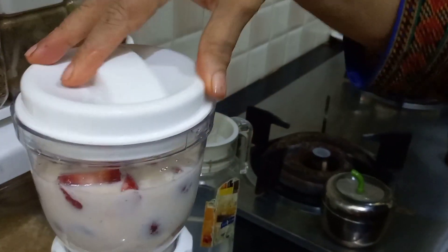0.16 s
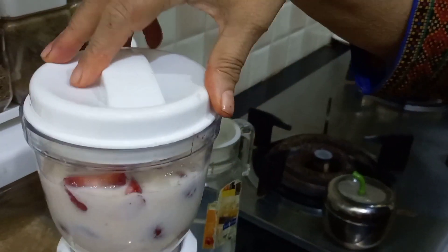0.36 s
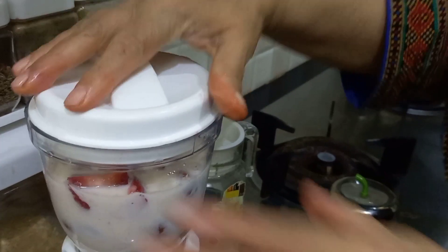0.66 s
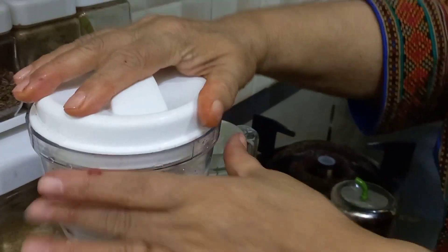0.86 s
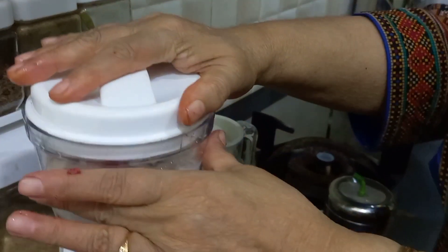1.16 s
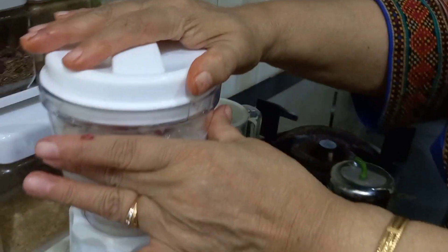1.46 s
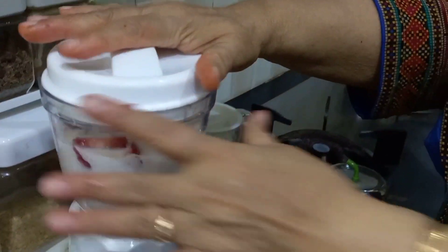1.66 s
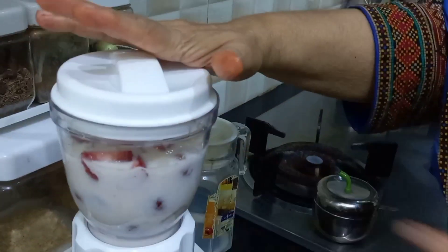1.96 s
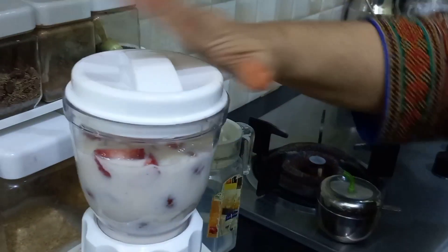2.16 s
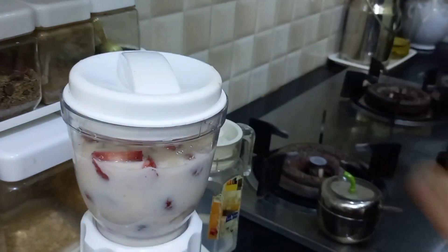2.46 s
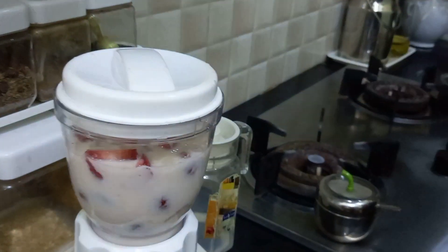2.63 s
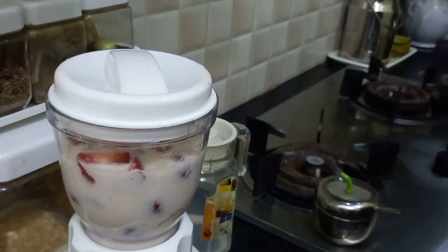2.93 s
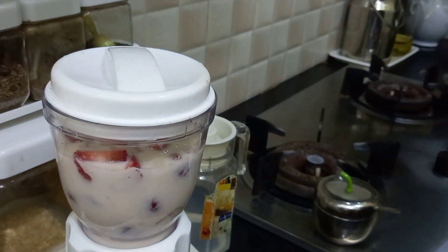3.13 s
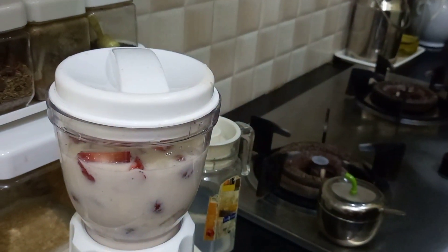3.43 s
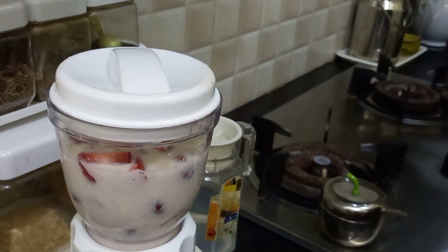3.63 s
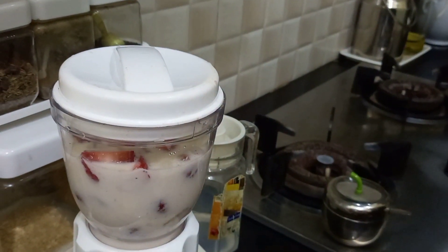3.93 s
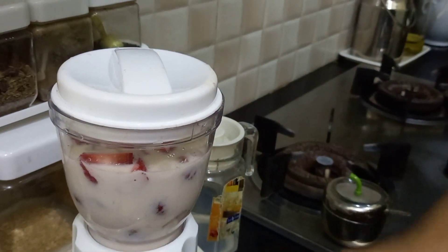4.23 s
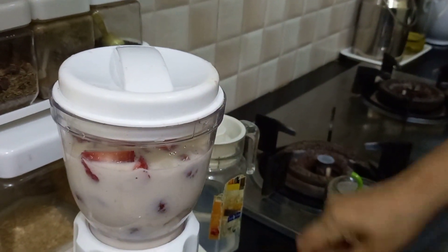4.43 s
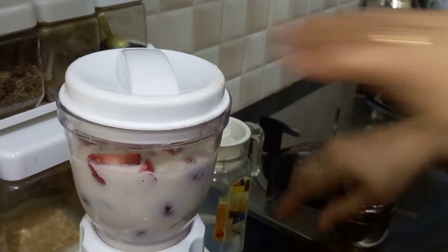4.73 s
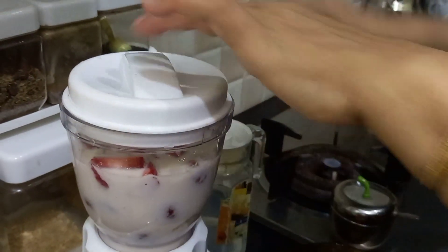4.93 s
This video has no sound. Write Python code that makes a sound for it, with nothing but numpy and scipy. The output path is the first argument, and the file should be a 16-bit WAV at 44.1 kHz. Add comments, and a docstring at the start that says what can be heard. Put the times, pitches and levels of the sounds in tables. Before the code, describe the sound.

A close stereo pickup in a small, reflective tiled kitchen, with low steady hiss and a faint wavering mains hum throughout. In the first quarter second a plastic lid is pressed onto a jar: a tight flurry of hollow finger thuds and bright rim clicks. Another click and a faint thud come at about 0.5 s, a dull double thud at 0.65, and light clicks at 0.9, 1.4 and 1.8. Skin and sleeve brush softly, most clearly around 1.1 s. Two quick palm taps and a click fall near 2.2 s, with tiny touches at 2.8. Then mostly faint rubbing between 3.1 and 3.75. At 4.04 s a catch snaps loudly, a hard object grinds and rings along the counter, swelling until about 4.5, and a cluster of very loud, hard knocks at 4.55 ends it. The short room tail fades into soft rubbing near 4.7 and a faint tap at 5.0.

```python
"""Lid pressed onto a jar, then a catch released

A plastic lid is pressed onto a blender jar in a small tiled kitchen: rim clicks, finger thuds, skin rubbing.
Later something hard comes off its catch, is dragged over the counter and banged home.
Each blow is a pulse plus decaying noise reflections, filtered by the resonances of the struck body.
Rubbing and dragging are shaped noise; wavering sines make a faint mains hum under steady room hiss.
"""
import sys
import numpy as np
from scipy import signal
from scipy.fft import rfft, irfft
from scipy.io import wavfile
from scipy.ndimage import uniform_filter1d

SR = 44100
rng = np.random.default_rng(int(sys.argv[2]) if len(sys.argv) > 2 else 0)


def dump(signal):
    """Clip the signal to [-1, 1] and save it as 16-bit WAV at the path in sys.argv[1]."""
    limited = np.clip(np.atleast_2d(signal).T, -1, 1)
    pcm = np.round(limited * 32767).astype(np.int16)
    wavfile.write(sys.argv[1], SR, pcm)


N = 224198


def amp(db):
    """Decibels to gain."""
    return 10 ** (np.asarray(db) / 20)


def evened(x):
    """Scales to rms 1."""
    return x / np.sqrt(np.mean(x ** 2) + 1e-20)


def read(points, hz):
    """Interpolates a spectrum table on a log-frequency axis."""
    point_hz, value = np.transpose(points)
    return np.interp(np.log(hz + 1), np.log(point_hz + 1), value)


def add(mix, start_s, sound):
    """Mixes a two-channel sound in at start_s, cut at the end of the mix."""
    part = mix[:, round(start_s * SR):][:, :sound.shape[1]]
    part += sound[:, :part.shape[1]]


def follow(time_s, level_db):
    """Gain along a level curve, -200 dB outside it."""
    return amp(np.interp(np.arange(N) / SR, time_s, level_db, left=-200, right=-200))


def colour_db(hz, broad, modes):
    """Broad spectrum plus bell-shaped resonances, each width_hz wide at half its dB height."""
    total_db = read(broad, hz)
    for mode_hz, width_hz, height_db in modes:
        total_db = total_db + height_db / (1 + (2 * (hz - mode_hz) / width_hz) ** 2)
    return total_db


def causal(gain_db):
    """Minimum-phase impulse response with the given gain curve, energy 1."""
    log_gain = np.log(amp(np.maximum(gain_db, -100)))
    circle = np.r_[log_gain, log_gain[-2:0:-1]]
    phase = -signal.hilbert(circle).imag
    taps = np.fft.ifft(np.exp(circle + 1j * phase)).real
    return taps / np.linalg.norm(taps)


def pair(frames, size, same, lag_ms):
    """Random short-time spectra for left and right, partly alike, the shared part late on the left."""
    hz = np.fft.rfftfreq(size, 1 / SR)
    a, b, c, d = rng.standard_normal((frames, len(hz), 4)).T
    alike = np.clip(read(same, hz), 0, 1)[:, None]
    right, own = a + 1j * b, c + 1j * d
    late = np.exp(-2j * np.pi * hz * lag_ms / 1000)[:, None]
    left = alike * right * late + np.sqrt(1 - alike ** 2) * own
    return hz, np.array([left, right])


def hiss(broad, modes, same, lag_ms, patchy_db, size=1024):
    """Steady coloured noise with drifting spectral patches, rms 1."""
    hop = size // 4
    frames = N // hop + 10
    hz, spectra = pair(frames, size, same, lag_ms)
    patches = rng.standard_normal((frames, len(hz))).T
    patches = uniform_filter1d(uniform_filter1d(patches, size=16, axis=0), size=16, axis=1)
    spectra *= amp(colour_db(hz, broad, modes)[:, None] + patchy_db * evened(patches))
    return evened(signal.istft(spectra, nperseg=size, noverlap=size - hop)[1][:, :N])


# left-right likeness of struck and dragged sounds: freq_hz, likeness_0_to_1
SAME = [(60, 0.37), (150, 1), (380, 0.98), (950, 0.67), (2380, 0.12), (5980, 0.34), (15000, 0.93)]
# nominal decay, before each blow's damping and the bend: freq_hz, t60_s
KITCHEN = [(100, 0.31), (250, 0.41), (530, 0.41), (1390, 0.35), (3680, 0.43), (9700, 0.48), (16000, 0.28)]
BEND_PER_S = 2.02  # tails die faster towards their end


def reflections(damping, lag_ms, lumpy_db):
    """Kitchen reflections: noise dying at a rate set per frequency, level not yet set."""
    frames, size, hop = 420, 256, 64
    hz, spectra = pair(frames, size, SAME, lag_ms)
    t = np.maximum(np.arange(frames) - 1, 0) * hop / SR
    lumps = evened(uniform_filter1d(rng.standard_normal((frames, len(hz))).T, size=24, axis=0))
    decay_db = -60 * damping * t * (1 + BEND_PER_S * t) / read(KITCHEN, hz)[:, None]
    spectra *= amp(lumpy_db * lumps + decay_db)
    return signal.istft(spectra, nperseg=size, noverlap=size - hop)[1]


def blows(rows, broad, modes, direct_db, lag_ms, build_hz, crack_ms, lumpy_db):
    """Each blow is a pulse and its kitchen reflections, heard through the struck body."""
    out, hz = np.zeros((2, N)), np.fft.rfftfreq(4096, 1 / SR)
    lag = round(lag_ms * SR / 1000)
    for start_s, level_db, tilt_db, pan_db, damping, crack_db, contact_ms in rows:
        hit = reflections(damping, lag_ms, lumpy_db)
        t = np.arange(hit.shape[1]) / SR
        hit *= 1 - np.exp(-build_hz * t)  # build_hz: rate per second
        hit /= np.sqrt(np.mean(hit[:, :882] ** 2))  # rms 1 over the first 20 ms
        hit[[0, 1], [max(lag, 0), max(-lag, 0)]] += amp(direct_db)  # direct pulse
        hit *= amp(crack_db * np.exp(-(t * 1000 / crack_ms) ** 2))  # early gain, fading to 0 dB
        soft_db = -10 * np.log10(1 + (hz * contact_ms / 1000) ** 8)  # longer contact, less treble
        tilted_db = tilt_db * np.log2(hz / 1000 + .1)
        body = causal(colour_db(hz, broad, modes) + tilted_db + soft_db)
        gain = amp(level_db + pan_db * np.array([[.5], [-.5]]))
        add(out, start_s, signal.fftconvolve(hit, body[None], axes=1) * gain)
    return out


# hum partials, sine amplitude before waver: freq_hz, level_db
HUM = [(48.4, -76.5), (193.8, -69), (242.2, -70), (344.5, -78), (393.0, -73), (441.4, -75.5), (683.7, -80),
       (780.6, -88)]
# room hiss colour: freq_hz, gain_db
AIR = [(12, -50), (20, -21.5), (38, 3.5), (119, 2.5), (166, -1.5), (197, -13), (253, -2.5), (275, -7),
       (384, -10.5), (1110, -20), (2160, -22.5), (2780, -25.5), (4110, -25.5), (5430, -23.5),
       (15600, -33.5)]
# bells on the hiss colour, also on rubbing: freq_hz, width_hz, height_db
AIR_MODES = [(2746, 120, 11.5), (6510, 200, 5), (694, 17, -20)]
# left-right likeness of room hiss and rubbing: freq_hz, likeness_0_to_1
AIR_SAME = [(30, .6), (60, 0.3), (150, 0.56), (380, 0.48), (950, 0.36), (2380, .6), (5980, 0.13),
            (15000, 0.34)]
AIR_DB, HUM_WAVER_DB, HUM_WAVER_RAD = -61, 3.1, 0.2


def kitchen_air():
    """Room hiss plus hum partials wavering in level and phase, the hum equal in both channels."""
    t = np.arange(N) / SR
    hum = np.zeros(N)
    for hz, level_db in HUM:
        waver = uniform_filter1d(rng.standard_normal(N), size=1500)
        waver = evened(uniform_filter1d(waver, size=1500))
        phase = 2 * np.pi * (hz * t + rng.random()) + HUM_WAVER_RAD * waver
        hum += amp(level_db + HUM_WAVER_DB * waver) * np.sin(phase)
    air = hiss(AIR, AIR_MODES, AIR_SAME, lag_ms=0.16, patchy_db=3.5, size=4096)
    return amp(AIR_DB) * air + hum


STROKE_FLAT, STROKE_EDGE_DB = 2.4, -21  # curve power (higher = flatter top); level at both ends


def stroke(start_s, loudest_s, end_s):
    """Rounded swell from start to end, gain 1 at its loudest."""
    away = np.interp(np.arange(N) / SR, [start_s, loudest_s, end_s], [-1, 0, 1])
    return amp(STROKE_EDGE_DB * abs(away) ** STROKE_FLAT) * (abs(away) < 1)


# strokes of skin and sleeve: start_s, loudest_s, end_s, level_db, top_level_db
STROKES = [(0.005, 0.03, 0.14, -62, -82), (0.31, 0.437, 0.65, -67, -63.5), (0.577, 0.717, 0.89, -63.5, -64),
           (0.89, 1.076, 1.228, -53.5, -57.5), (1.506, 1.654, 1.97, -67.5, -78),
           (1.753, 2.165, 2.48, -67, -66), (2.25, 2.51, 2.74, -70.5, -66.5), (2.69, 2.91, 2.93, -71.5, -70),
           (3.113, 3.25, 3.41, -65, -78), (3.256, 3.347, 3.48, -67.5, -63.5),
           (3.412, 3.557, 3.75, -65, -64), (3.6, 3.8, 4.9, -75.5, -72), (4.597, 4.72, 5.1, -60.5, -64.5)]
# main rubbing colour: freq_hz, gain_db
RUB_COLOUR = [(530, -40), (900, -19), (1400, -19), (1550, -16.5), (2290, -9.5), (2670, -10.5), (4380, -4.5),
              (5340, -11), (5930, -6.5), (11000, -11), (14300, -45), (22000, -120)]
# thin top of the rubbing: freq_hz, gain_db
RUB_TOP = [(5880, -13.5), (10000, -13.5), (11600, 1.5), (13100, 4), (15000, 6.5), (15600, 2.5)]
SLIP_RISE_S, SLIP_FALL_DB_PER_S, SLIP_TOP_DB = 0.0013, 233, -4


def rubbing():
    """Soft wide hiss of skin and cloth: slow strokes, and a short skin slip after each rim click."""
    t, level, top = np.arange(N) / SR, 0, 0
    for start_s, loudest_s, end_s, level_db, top_level_db in STROKES:
        swell = stroke(start_s, loudest_s, end_s)
        level = level + amp(level_db) * swell
        top = top + amp(top_level_db) * swell
    for start_s, *_, slip_db in CLICKS:
        since_s = np.maximum(t - start_s, 0)
        slip = np.minimum(since_s / SLIP_RISE_S, 1) * amp(slip_db - SLIP_FALL_DB_PER_S * since_s)
        level = level + slip
        top = top + amp(SLIP_TOP_DB) * slip
    body = hiss(RUB_COLOUR, AIR_MODES, AIR_SAME, lag_ms=0.15, patchy_db=2.5)
    thin = hiss(RUB_TOP, [], AIR_SAME, lag_ms=0.27, patchy_db=2.0)
    return body * level + thin * top


# fingers and palm on the lid: start_s, level_db, tilt_db_per_octave, left_right_db, damping_factor, crack_db
THUDS = [(.012, -49, -3, -2, 1.4, 1.5), (0.027, -44, -2, 0, 0.69, 5.5), (0.0383, -43.5, 1, 4.5, 1, 9),
         (.140, -35.5, 2, 2, 0.8, 0.5), (0.158, -37.5, 3, 2.5, 0.74, -2), (.186, -33, 3.5, 5, 1.54, 5.),
         (.197, -33.5, -3.2, 0, 1.64, 13), (.207, -40.5, -7.5, 3, 1.3, -2), (0.481, -52, -6, 5, 1, -2),
         (0.6425, -40.5, -5, 4, 1.6, 2), (0.663, -47.5, -4.5, -5, 1.6, 4.5),
         (2.1548, -44.5, 5.5, 6, 0.84, 9.5), (2.163, -36, 1.9, -1, 1.2, 1.5),
         (2.868, -59, 7.5, -1, 0.63, -4), (5.013, -50, -7, -1.5, 1.06, -1.5)]
# lid colour: freq_hz, gain_db
LID = [(47, -33), (80, -27.5), (236, -2.5), (301, -8), (448, -7), (760, -6), (907, -5), (1040, -15),
       (1320, -15.5), (1680, -30), (2050, -18), (3650, -15.5), (15600, -55)]
# lid resonances: freq_hz, width_hz, height_db
LID_MODES = [(236.4, 12, 5.2), (344, 14.4, 11.4), (408.3, 39, 11.7), (468.5, 12.5, 9.8), (714, 18, 4.7),
             (830, 12, 5), (1100, 32, 6.6), (1332, 21, 4.4), (2050, 360, 5)]
FINGER_CONTACT_MS = 0.56


def finger_thuds():
    """Soft fingertips stay in contact long, so the lid's low resonances dominate."""
    presses = [(*row, FINGER_CONTACT_MS) for row in THUDS]
    return blows(presses, LID, LID_MODES, direct_db=22.0, lag_ms=-0.15, build_hz=880, crack_ms=4.9,
                 lumpy_db=3.5)


# lid rim snapping: start_s, level_db, tilt_db_per_octave, left_right_db, damping_factor, crack_db, skin_slip_db
CLICKS = [(0.1258, -45.5, 3.5, 5, 0.32, 10, -51.5), (0.185, -49, 14, 3, 1.24, 15.5, -42.5),
          (0.2412, -46, -4.5, 0, 1.25, 20.5, -72), (0.4847, -42, -3.5, -1, 1.16, 2, -47),
          (0.9088, -49, -1.3, 1, 0.6, 3.5, -62), (1.3686, -48.5, 0.7, 0, 1.07, 12, -60),
          (1.8063, -49, 0.7, -1.5, 1.36, 6, -68), (2.2356, -47, -3, -1.5, 1.2, 8.5, -74),
          (2.8073, -62, -5.5, 4, 1.04, -7, -86), (5.019, -63, 3, -8, 0.57, 3, -77)]
# rim colour: freq_hz, gain_db
RIM = [(180, -22), (300, -8.5), (425, -3), (485, -27.5), (611, -17.5), (879, -10), (1220, -10),
       (1680, -9.5), (2620, -1), (3770, -13.5), (4100, -10), (4680, -13), (15600, -34.5)]
# rim resonances: freq_hz, width_hz, height_db
RIM_MODES = [(417, 18, 11.7), (1222, 53, 11), (2230, 220, 7.8), (2694, 99, 9.3), (3195, 480, 5.6),
             (3840, 65, 2.9), (6440, 410, 9)]
RIM_CONTACT_MS = 0.059


def rim_clicks():
    """The rim snaps with very short contact, keeping the treble."""
    snaps = [(*row[:-1], RIM_CONTACT_MS) for row in CLICKS]
    return blows(snaps, RIM, RIM_MODES, direct_db=13, lag_ms=0.16, build_hz=1520, crack_ms=2.8,
                 lumpy_db=0.3)


# catch letting go: start_s, level_db, tilt_db_per_octave, left_right_db, damping_factor, crack_db, contact_ms
RELEASE = [(3.998, -45.5, 4, 1.5, 0.33, -11.5, 0.89), (4.0383, -17, 3, 2.5, 0.97, 7.5, 0.035),
           (4.0502, -23.5, -3, -1.2, 0.7, -8, .05)]
# catch colour: freq_hz, gain_db
CATCH = [(35, -61), (60, -20.5), (156, -26), (201, -7.5), (237, -17.5), (279, 1), (321, -14), (434, -2.5),
         (548, -14.5), (980, -5.5), (1420, -3), (1530, 2), (3780, -7.5), (7430, -30.5), (15600, -37.5)]
# catch resonances: freq_hz, width_hz, height_db
CATCH_MODES = [(292, 31, 5.3), (457, 31, 1.7), (995, 57, 8.5), (1218, 75, 11.2), (1504, 48, 5.4),
               (1830, 50, 9.2), (2390, 80, 4.), (2614, 97, 12), (3040, 130, 4.9), (3240, 26, 4.7),
               (3716, 93, 8.6), (4170, 55, 6.)]


def catch_release():
    """A catch lets go in a few blows that excite its resonances."""
    return blows(RELEASE, CATCH, CATCH_MODES, direct_db=17.5, lag_ms=0.17, build_hz=1516, crack_ms=4.2,
                 lumpy_db=2.0)


# ringing scrape level, before slips: time_s, level_db
DRAG = [(4.16, -58), (4.23, -39), (4.281, -39.5), (4.324, -42), (4.329, -36.5), (4.42, -29.5), (4.485, -28),
        (4.53, -31), (4.6, -44.5)]
# scrape colour: freq_hz, gain_db
DRAG_COLOUR = [(240, -61), (400, -36.5), (615, -34.5), (1020, -9.5), (1150, -10), (1510, -7), (1700, -14.5),
               (2090, -16.5), (2450, -25), (9000, -46.5), (11700, -77), (19800, -120)]
# scrape resonances: freq_hz, width_hz, height_db
DRAG_MODES = [(1016, 35, 17.), (1220, 30, 7.), (1315, 45, 13.), (1400, 50, 5.), (1540, 28, 15.),
              (2092, 45, 12.), (2740, 100, 9.), (4240, 80, 5.), (5050, 60, 11.), (6560, 150, 8.)]
# dry grit colour: freq_hz, gain_db
GRIT = [(180, -53), (300, -17.5), (437, -10.5), (637, -33), (677, -6.5), (1020, -2), (2360, -25),
        (2750, -15.5), (11000, -39.5), (14300, -66), (22000, -120)]
# sliding face colour: freq_hz, gain_db
DRAG_HISS = [(3530, -43.5), (6000, -18), (6550, -6.5), (7330, -16.5), (9560, -4.5), (11100, -10),
             (12000, -2.5), (14200, 0.5), (15600, -13)]
DRAG_START_S, DRAG_END_S, DRAG_STOP_S = 4.045, 4.55, .06
FACE_START_DB, FACE_END_DB = -57.5, -51
GRIT_START_DB, GRIT_END_DB = -43, -50  # before slips
SLIP_DB = 2.2


def drag():
    """Uneven slips shake the dragged thing's resonances; grit grinds and its face hisses."""
    slips = amp(SLIP_DB * evened(uniform_filter1d(rng.standard_normal(N), size=300)))
    span_s = [DRAG_START_S, DRAG_END_S, DRAG_END_S + DRAG_STOP_S]
    scrape = hiss(DRAG_COLOUR, DRAG_MODES, SAME, lag_ms=0.16, patchy_db=2.0, size=2048)
    scrape *= follow(*np.transpose(DRAG))
    grit = hiss(GRIT, [], SAME, lag_ms=0.17, patchy_db=1.0)
    grit *= follow(span_s, [GRIT_START_DB, GRIT_END_DB, -80])
    face = hiss(DRAG_HISS, [], SAME, lag_ms=.15, patchy_db=1.5)
    face *= follow(span_s, [FACE_START_DB, FACE_END_DB, -80])
    return scrape * np.sqrt(slips) + grit * slips + face


# counter knocks: start_s, level_db, tilt_db_per_octave, left_right_db, damping_factor, crack_db, contact_ms
BANGS = [(4.5328, -20.5, 7, 2.5, 1.1, 7.5, 0.58), (4.540, -30, 4, -3, 0.45, 5, 0.55),
         (4.5445, -17.5, 3, -2, 0.92, 3.5, 0.57), (4.5469, -12, 1.75, 2.5, 1.25, 3.5, .04),
         (4.5635, -15, 0.3, 1, 0.92, 8.5, .3)]
# counter colour: freq_hz, gain_db
COUNTER = [(35, -68), (100, -25), (243, -7), (336, -12), (488, -8), (601, -17.5), (691, -10), (1490, -2.5),
           (1670, -9), (2550, -5.5), (4250, -11), (7260, -28.5), (7970, -37.5), (12400, -29.5),
           (15600, -32)]
# counter resonances: freq_hz, width_hz, height_db
COUNTER_MODES = [(257, 67, 2.8), (451.6, 9.8, 1.6), (1010, 32, 5.), (1172, 94, 5.5), (1530, 130, 6.7),
                 (2000, 36, 1.3), (2105, 42.5, 11), (2725, 53, 5.3), (3670, 46, 5.5), (4140, 90, 4.5),
                 (5250, 220, 5.2), (9600, 290, 9.5)]


def counter_bangs():
    """Hard knocks excite the counter's resonances."""
    return blows(BANGS, COUNTER, COUNTER_MODES, direct_db=17.5, lag_ms=.19, build_hz=1515, crack_ms=6.4,
                 lumpy_db=2.0)


def scene():
    """Sum of all sources, left and right."""
    lid = rubbing() + finger_thuds() + rim_clicks()
    return kitchen_air() + lid + catch_release() + drag() + counter_bangs()


# channel colour: freq_hz, left_right_db
LEAN = [(60, 0), (130, 0.5), (290, -2.5), (640, 0.0), (1410, -0.5), (3100, -11), (6820, -3.5),
        (15000, -3.5)]
EDGE_HZ, BASS_CUT_HZ = 15800, 40


def record(dry):
    """Colours each channel, cuts deep bass, clips at full scale, then low-passes."""
    hz = np.fft.rfftfreq(N, 1 / SR)
    lean = amp(read(LEAN, hz) * np.array([[.5], [-.5]]))
    colour = lean / np.sqrt(1 + (BASS_CUT_HZ / (hz + 1)) ** 6)
    channels = np.clip(irfft(rfft(dry, axis=1) * colour, N, axis=1), -1, 1)
    low_pass = signal.firwin(511, EDGE_HZ, window=("kaiser", 9), fs=SR)
    return signal.oaconvolve(channels, low_pass[None], "same")


dry = scene()
out = record(dry)
dump(out)
```